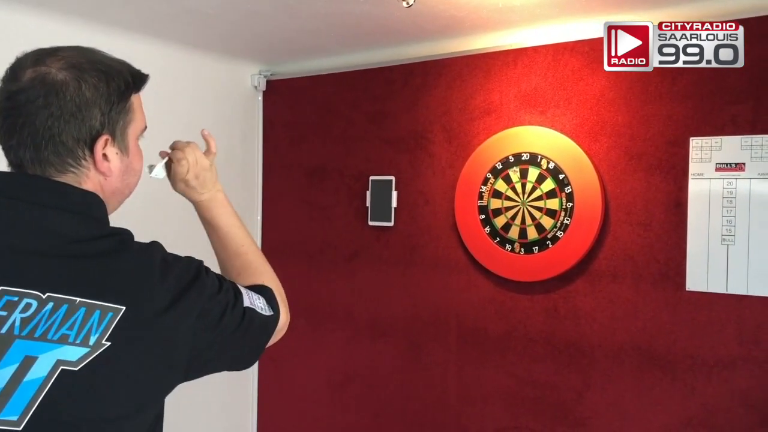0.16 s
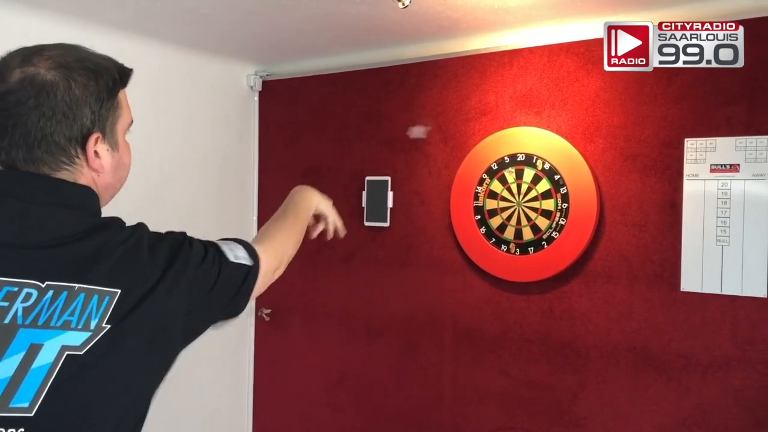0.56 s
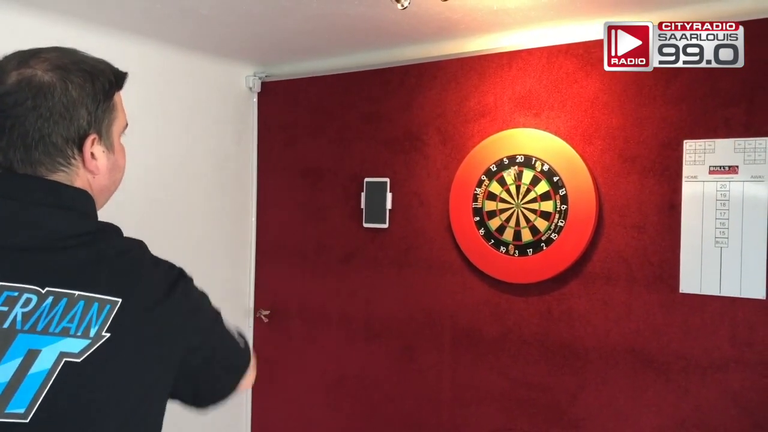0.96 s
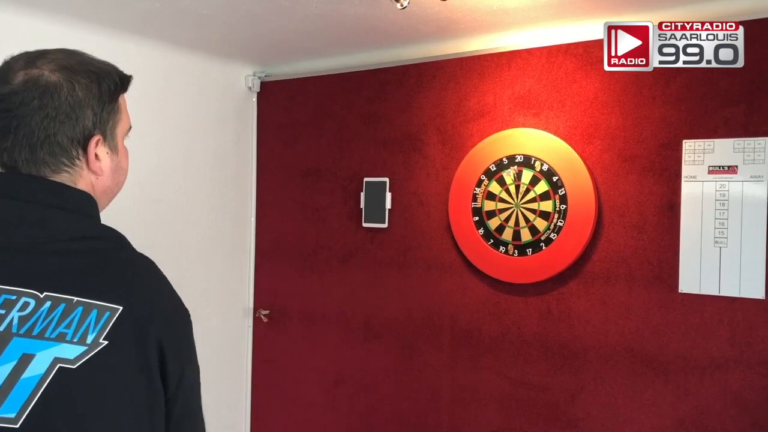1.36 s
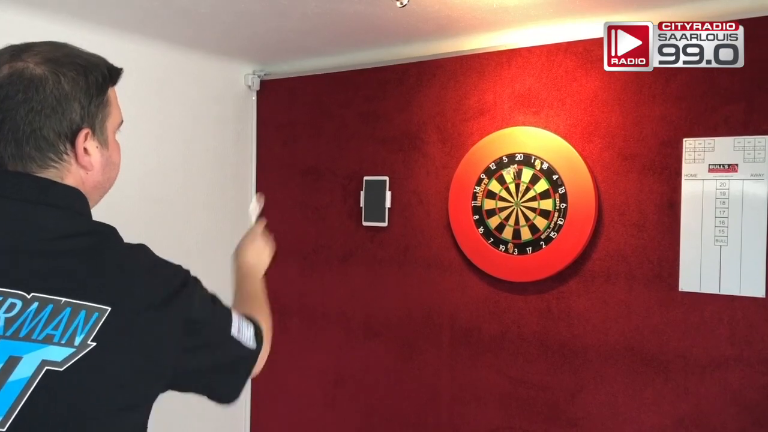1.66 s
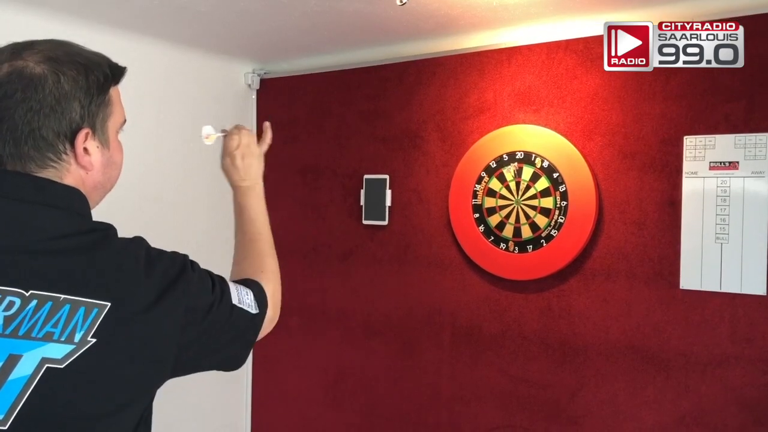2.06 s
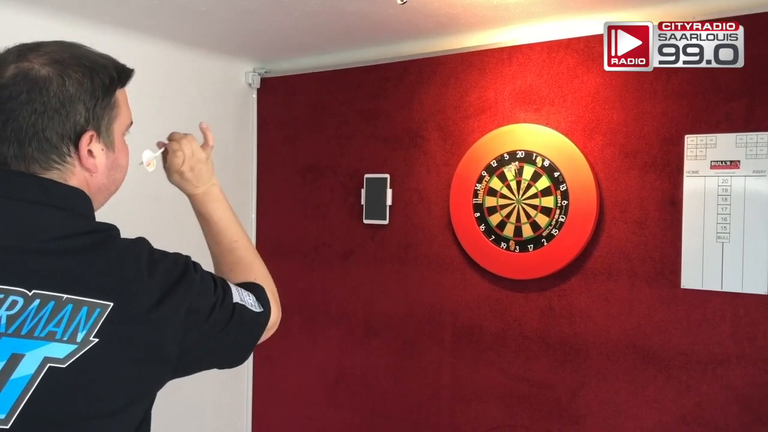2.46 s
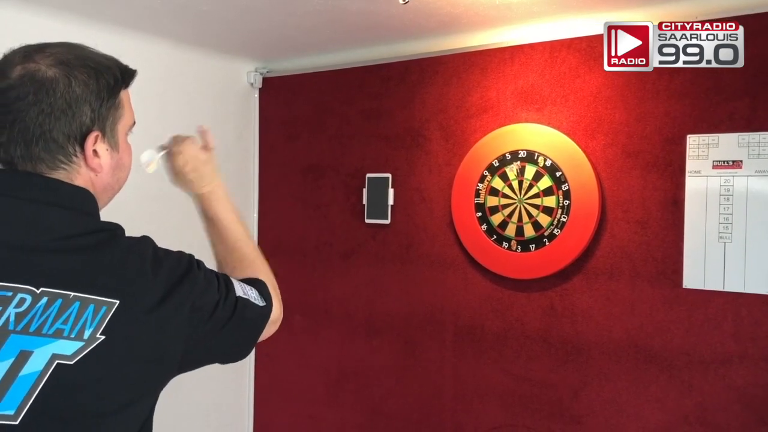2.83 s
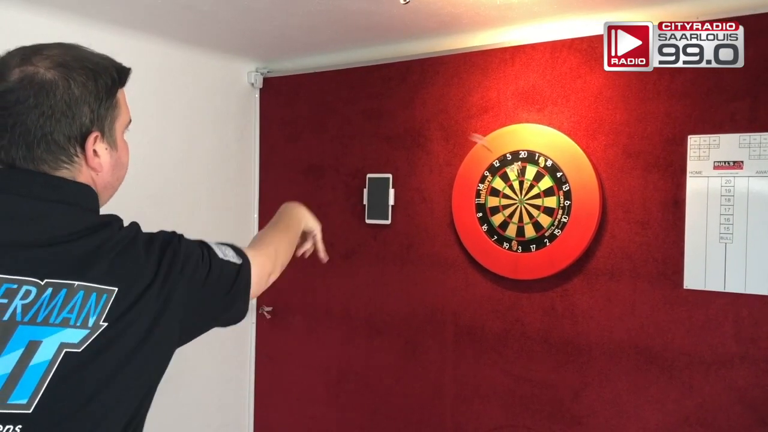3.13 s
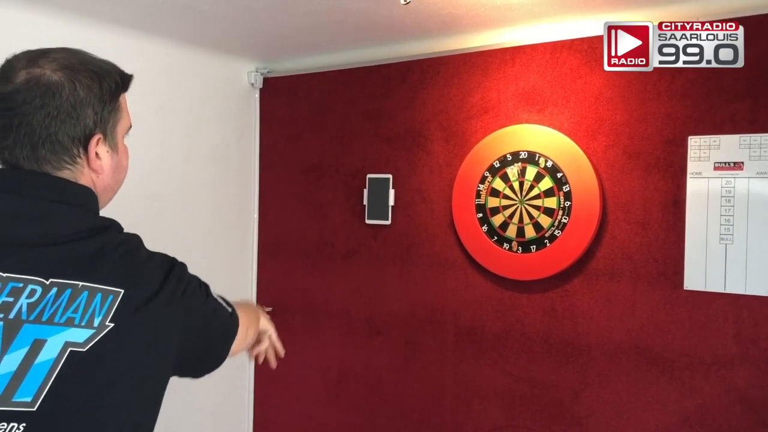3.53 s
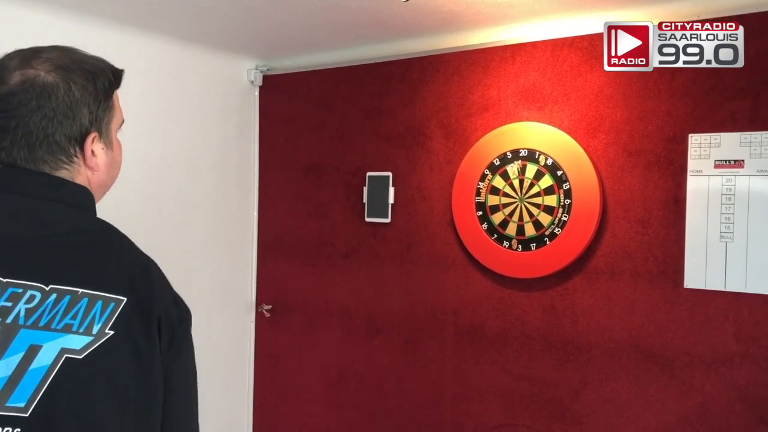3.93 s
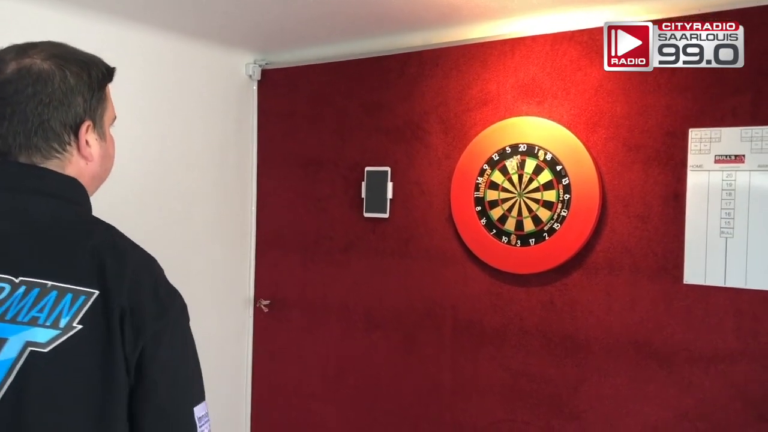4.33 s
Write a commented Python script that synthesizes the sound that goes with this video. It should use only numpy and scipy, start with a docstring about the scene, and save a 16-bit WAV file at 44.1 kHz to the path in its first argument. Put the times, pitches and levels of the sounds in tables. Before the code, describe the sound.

In a quiet small room, two darts hit a board seconds apart with crisp, rattling thuds and short echoes; faint cloth rustle follows.

```python
"""Two darts hit a board

Two steel-tip darts are thrown into a bristle board in a small room. A sleeve swish is noise that swells.
Each point ticks in, then barrel, shaft and flight rattle: bursts of noise plus decaying sine tones.
The board thuds on its wall and the room's low tones ring on, all as decaying sines with random echoes.
Room air, a fading rumble, a thin passing hiss, the shirt's rustle and a soft step are coloured noise."""
import sys
import numpy as np
from scipy import signal
from scipy.fft import rfft, irfft, next_fast_len
from scipy.io import wavfile

SR = 44100
rng = np.random.default_rng(int(sys.argv[2]) if len(sys.argv) > 2 else 0)


def pcm_store(signal):
    """Save signal as 16-bit PCM."""
    levels = np.round(np.clip(np.atleast_2d(signal), -1, 1) * 32767)
    wavfile.write(sys.argv[1], SR, levels.astype(np.int16).T)


N = 197964
T = np.arange(N) / SR
TAIL = T[:2 ** 15]  # time axis of one struck sound, s

# All levels in the tables are relative; t60 is the time to fade by 60 dB.
# steady air of the room: f/Hz, level/dB per Hz
AIR_COLOUR = [(15, -39), (25, -12.5), (55, 1.5), (75, -18), (99, 0), (160, -7), (204, -6.5), (368, -9),
              (762, -13), (945, -17), (1240, -15.5), (2120, -21.5), (2630, -21), (3090, -26),
              (15500, -34.5)]
# a dull rumble that dies away: f/Hz, level/dB per Hz
RUMBLE_COLOUR = [(30, -22), (48, 0.5), (70, -6.5), (100, -6), (145, -2.5), (250, 1.5), (350, -10.5),
                 (850, -16.5), (1150, -9.5), (1900, -23), (4000, -38.5), (9000, -49)]
# a thin hiss that comes and goes between the throws: f/Hz, level/dB per Hz
THIN_COLOUR = [(500, -28), (1800, -4), (2850, -1), (3600, -10), (6000, -16), (15500, -26)]
# cloth swishes, the sleeve in each throw and as the arm drops:
# t/s of top speed, level/dB, width/s of the speeding-up side, tilt/dB per octave
SLEEVE_SWISHES = [(0.585, -61.5, 0.053, -0.5), (3.062, -62.5, 0.06, -0.5), (3.52, -62, 0.034, -5.5),
                  (3.833, -61.5, 0.031, -3.5)]
# colour of the sleeve: f/Hz, level/dB per Hz
SLEEVE_COLOUR = [(150, -9.5), (700, -2.5), (1500, -4.5), (2800, 0.5), (5000, -3.5), (8000, -9),
                 (12000, -10.5), (15500, -6.5)]
# colour of the rubbing shirt: f/Hz, level/dB per Hz
SHIRT_COLOUR = [(24, -48), (40, -10), (170, -16.5), (247, -3), (317, -11), (359, -10.5), (484, -10.5),
                (778, -8), (973, -12.5), (1080, -8), (15500, -24.5)]
# the point ticks into the fibres, one row a throw: t/s, tick level/dB, scrape t60/s, ping level/dB
POINT_TICKS = [(0.808, -4, .04, -20.5), (3.2876, -10.5, .05, -11.5)]
# shaft and flight whip to and fro, one row a throw:
# t/s of the hardest knock, level/dB, time between knocks/s, loss per knock/dB, tilt/dB per octave
SHAFT_RATTLES = [(0.8235, -4.5, .0077, 2, 0), (3.3054, 4.5, .0048, 5, 1.8)]
# colour of a knock: f/Hz, level/dB
KNOCK_TONE = [(100, -23), (400, 6), (1000, 2.5), (1400, 3), (2100, 9.5), (3100, 1), (5000, 3.5), (7500, -4),
              (10000, 4), (12000, -2), (15500, 0.5)]
# short ping of the steel point in the fibres: f/Hz, t60/s, level/dB
POINT_PING = [(1130, 0.04, -20.5), (2213, .03, -21), (5550, .025, -30.5), (12200, .025, -12),
              (12900, 0.021, -19.5)]
# ring of barrel, shaft and flight: f/Hz, t60/s, level in dart 0/dB, level in dart 1/dB
DART_RING = [(1831, .22, -51, -55), (1960, .24, -48, -63), (2138, .24, -45, -58), (2338, .22, -58, -53),
             (2610, .28, -65, -50), (3731, .25, -57, -57), (4803, .27, -48, -53), (4872, .26, -50, -49),
             (4980, .25, -51, -54), (6454, .2, -59, -52), (7130, .2, -60, -53), (9828, .13, -55, -47),
             (9988, .13, -54, -47)]
# the board takes up the dart's momentum: t/s, level/dB
BOARD_THUDS = [(0.8370, 1), (3.3133, 1.5)]
# the board on its wall, heavily damped: f/Hz, t60/s, level/dB
BOARD_RING = [(85.6, 0.13, -20.5), (272, 0.15, -28.5), (344.3, 0.14, -15), (538, 0.051, -1),
              (681, 0.014, 4.5), (746, .05, -2)]
# standing waves of the room: f/Hz, t60/s, level/dB
ROOM_RING = [(112, .6, -49), (130, .5, -52), (146, .5, -49), (250, .55, -49), (366, .6, -37.5),
             (436, .55, -49), (457, .55, -50), (517, .5, -44), (567, .5, -46), (657, .45, -43),
             (753, .45, -46), (807, .45, -47)]
# dense echoes of the room: f/Hz, t60/s, level/dB relative to the direct sound
ROOM_ECHO = [(60, 1, -1.5), (123, 0.64, 4.5), (320, 0.57, 4), (700, 0.46, -3.5), (1200, 0.46, -4.5),
             (2450, 0.47, -5.5), (4760, 0.36, 1), (7960, 0.24, 1.5), (15000, 0.19, -7.5)]
# colour of the step: f/Hz, level/dB per Hz
STEP_COLOUR = [(30, -33), (90, -10), (200, 0), (500, -6.5), (1200, -12), (3000, -15.5), (9000, -39)]

AIR_DB = -68.5
# the rumble holds, then dies away at a steady rate
RUMBLE_DB, RUMBLE_HOLD_S, RUMBLE_FALL_DB_PER_S = -60.5, .85, 9.5
THIN_S, THIN_DB, THIN_WIDTH_S = 1.33, -78.5, 0.49
SWELL_POWER = 2.66  # friction noise grows with this power of the speed
SLOWING = 1.37  # a movement takes this much longer to slow down than to speed up
# the shirt starts to rub as the arm drops and swells while the body turns
SHIRT_START_S, SHIRT_ATTACK_S, SHIRT_DB = 3.6, 0.51, -63
TOUCH_LEAD_S, TOUCH_DB = 0.0043, -16  # the very tip pricks the fibres first, relative to the tick
TICK_TILT_DB = 1  # per octave
# the first swing only grazes; level and tilt (per octave) are relative to the rattle's own
GRAZE_DB, GRAZE_TILT_DB, GRAZE_PING_DB = -7.5, 1.0, -16.5
HARD_DB, HARD_T60_S = 1.5, 0.02  # the hardest knock stands out, a short crack
# KNOCK_T60_S also serves the graze; DULLING is treble lost, dB per octave for each dB of weakening
KNOCK_T60_S, KNOCK_PING_DB, DULLING = .028, -20.5, .22
PUSH_S = 0.00097  # how long the fibres take to brake the dart
STEP_S, STEP_DB, STEP_WIDTH_S = 4.13, -63, 0.077
TOP_HZ = 15750


def undb(db):
    """Turn decibels into a gain."""
    return 10 ** (np.asarray(db) / 20)


def unit(x):
    """Scale a sound to an average (rms) strength of 1."""
    return x / np.sqrt(np.mean(x ** 2))


def add(out, s, x):
    """Mix x into out from time s."""
    i = int(s * SR)
    out[i:i + len(x)] += x[:N - i]


def colour(x, points, tilt_db=0):
    """Filter through (f/Hz, level/dB) points, tilted per octave about 5 kHz, with no sound before its cause."""
    size = next_fast_len(2 * len(x)) * 2
    octave = np.log2(np.maximum(np.arange(size // 2 + 1) * SR / size, 1))
    hz, db = np.transpose(points)
    # the tilt stops growing two octaves below its pivot
    tilt = tilt_db * np.maximum(octave - np.log2(5000), -2)
    gain = undb(np.interp(octave, np.log2(hz), db) + tilt)
    # folding the cepstrum makes the filter respond as early as it can (minimum phase)
    cepstrum = irfft(np.log(gain))
    cepstrum[1:size // 2] *= 2
    cepstrum[size // 2 + 1:] = 0
    response = np.exp(rfft(cepstrum))
    return irfft(rfft(x, size) * response)[:len(x)]


def fade(t60):
    """Die away smoothly, losing 60 dB in t60 seconds."""
    return np.exp(-np.log(1000) * TAIL / t60)


def ring(hz, t60):
    """One struck tone: a sine that dies away."""
    return np.sin(2 * np.pi * hz * TAIL) * fade(t60)


def walk(rate):
    """Random wander: straight lines between random values, rate of them a second."""
    steps = rng.standard_normal(1024)
    return np.interp(T * rate, np.arange(len(steps)), steps)


def hiss(points, flutter_db, rate, tilt_db=0):
    """Coloured noise whose level flutters."""
    noise = colour(rng.standard_normal(N), points, tilt_db)
    return unit(noise * undb(flutter_db * walk(rate)))


def swell(s, width):
    """Loudness of a movement that speeds up until time s and slows again."""
    side = np.where(T < s, width, width * SLOWING)
    speed = 1 / np.sqrt(1 + ((T - s) / side) ** 2)
    return speed ** SWELL_POWER


def room(gap_s=0.004, build_s=0.00095):
    """Dense echoes of one blow, as fading noise in overlapping bands; the treble dies first."""
    hz, t60, db = np.transpose(ROOM_ECHO)
    noise = rfft(rng.standard_normal(len(TAIL)))
    octave = np.log2(np.maximum(np.arange(len(noise)) * SR / len(TAIL), 1))
    centres = np.log2(40) + np.arange(19) / 2  # half an octave apart, from 40 Hz
    onset = 1 - np.exp(-np.maximum(TAIL - gap_s, 0) / build_s)
    response = 0
    for centre in centres:
        weight = np.maximum(1 - 2 * np.abs(octave - centre), 0)
        band_t60 = np.interp(centre, np.log2(hz), t60)
        band = irfft(noise * weight) * onset * fade(band_t60)
        # a wider band carries more of a blow's energy
        share = np.sqrt(np.mean(weight ** 2))
        gain = undb(np.interp(centre, np.log2(hz), db)) * share
        response = response + gain * band / np.linalg.norm(band)
    return response


def background():
    """Quiet room air, a fading rumble and a thin passing hiss, each made of coloured noise."""
    air = hiss(AIR_COLOUR, flutter_db=.3, rate=6)
    rumble = hiss(RUMBLE_COLOUR, flutter_db=.8, rate=12)
    rumble_db = RUMBLE_DB - RUMBLE_FALL_DB_PER_S * np.maximum(T - RUMBLE_HOLD_S, 0)
    thin = swell(THIN_S, THIN_WIDTH_S) * hiss(THIN_COLOUR, flutter_db=1, rate=14)
    return undb(AIR_DB) * air + undb(rumble_db) * rumble + undb(THIN_DB) * thin


def clothes():
    """Rubbing cloth: the sleeve swishes as the arm speeds up and slows; the shirt rubs softly later."""
    turning = 1 - np.exp(-np.maximum(T - SHIRT_START_S, 0) / SHIRT_ATTACK_S)
    out = undb(SHIRT_DB) * turning * hiss(SHIRT_COLOUR, flutter_db=-1.0, rate=56)
    for s, db, width, tilt_db in SLEEVE_SWISHES:
        cloth = hiss(SLEEVE_COLOUR, flutter_db=2.0, rate=89, tilt_db=tilt_db)
        out = out + undb(db) * swell(s, width) * cloth
    return out


def knock(dart, t60, tilt_db, ping_db, modes_db=1.0, rattle_db=-7, grain_db=3.0, rise_s=0.00061):
    """A burst of tiny contacts with a short ping; the dart's own tones ring on after it."""
    ping = sum(undb(db) * ring(hz, decay) for hz, decay, db in POINT_PING)
    pressure = (1 - np.exp(-TAIL / rise_s)) * fade(t60)
    noise, size = rng.standard_normal((2, len(TAIL)))
    contacts = noise * undb(grain_db * size) * pressure
    # the swinging flight sends each knock along other paths: fresh random echoes
    heard = contacts / np.linalg.norm(contacts) + room()
    rattle = colour(heard, KNOCK_TONE, tilt_db)
    # a rattling shaft never rings at quite the same pitch twice
    detune = 1 + .002 * rng.standard_normal(len(DART_RING))
    modes = sum(undb(dbs[dart]) * ring(hz * d, decay)
                for (hz, decay, *dbs), d in zip(DART_RING, detune))
    return undb(rattle_db) * rattle + undb(modes_db) * modes + undb(ping_db) * ping


def darts(count=5):
    """The point pricks and ticks in; the whipping shaft grazes, knocks hard, then weaker and duller."""
    out = np.zeros(N)
    for dart, (s, db, t60, ping_db) in enumerate(POINT_TICKS):
        touch = knock(dart, t60, TICK_TILT_DB, ping_db)
        add(out, s - TOUCH_LEAD_S, undb(db + TOUCH_DB) * touch)
        tick = knock(dart, t60, TICK_TILT_DB, ping_db)
        add(out, s, undb(db) * tick)
    for dart, (s, db, gap, loss_db, tilt_db) in enumerate(SHAFT_RATTLES):
        graze = knock(dart, KNOCK_T60_S, tilt_db + GRAZE_TILT_DB, GRAZE_PING_DB)
        add(out, s - gap, undb(db + GRAZE_DB) * graze)
        hardest = knock(dart, HARD_T60_S, tilt_db, KNOCK_PING_DB)
        add(out, s, undb(db + HARD_DB) * hardest)
        for k in range(1, count):
            lost_db = k * loss_db
            later = knock(dart, KNOCK_T60_S, tilt_db - DULLING * lost_db, KNOCK_PING_DB)
            add(out, s + k * gap, undb(db - lost_db) * later)
    return out


def board(thud_db=-27, build_s=0.0096, baffle_hz=110, waves_db=2):
    """The fibres brake the dart in a short push; the board thuds and the wall drives the room's tones."""
    out = np.zeros(N)
    body = undb(thud_db) * sum(undb(db) * ring(hz, t60) for hz, t60, db in BOARD_RING)
    # a disc this small radiates deep bass poorly
    body = signal.sosfilt(signal.butter(2, baffle_hz, "high", fs=SR, output="sos"), body)
    # every second standing wave starts in the opposite direction
    waves = sum((-1) ** k * undb(db) * ring(hz, t60) for k, (hz, t60, db) in enumerate(ROOM_RING))
    waves = undb(waves_db) * waves * (1 - np.exp(-TAIL / build_s))
    push = np.sin(np.pi * np.minimum(TAIL / PUSH_S, 1))
    for s, db in BOARD_THUDS:
        thud = body + signal.fftconvolve(body, room())[:len(TAIL)]
        blow = undb(db) * thud + waves
        add(out, s, signal.fftconvolve(blow, push / push.sum()))
    return out


def step():
    """A soft step back from the line: dull noise swells and fades as the weight shifts."""
    return undb(STEP_DB) * swell(STEP_S, STEP_WIDTH_S) * hiss(STEP_COLOUR, flutter_db=3.5, rate=40)


def scene():
    """Both throws with the sounds of the thrower and the room, as one channel."""
    return (background() + clothes() + darts() + board() + step())[None]


def record(dry):
    """The microphone drops the deepest bass; the top is cut steeply."""
    dry = signal.sosfilt(signal.butter(8, 42, "high", fs=SR, output="sos"), dry)
    return signal.sosfilt(signal.ellip(10, .2, 70, TOP_HZ, fs=SR, output="sos"), dry)


dry = scene()
out = record(dry)
pcm_store(out)
```